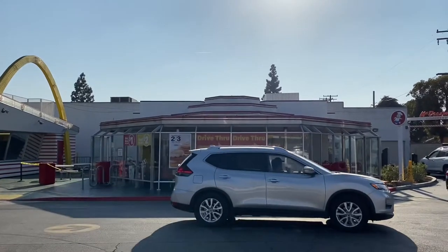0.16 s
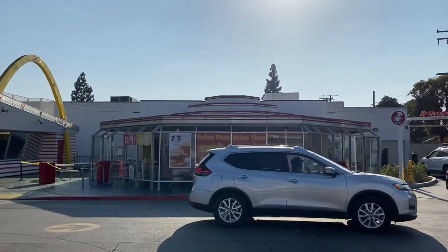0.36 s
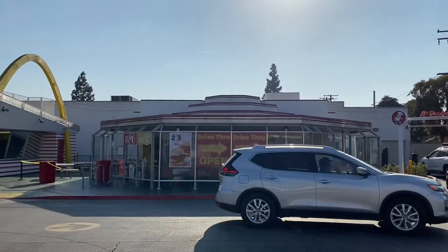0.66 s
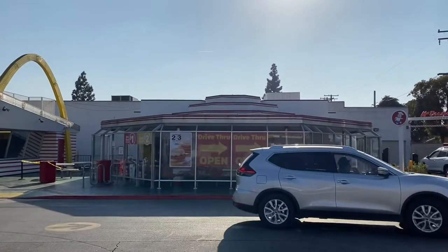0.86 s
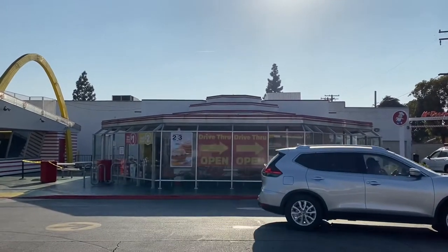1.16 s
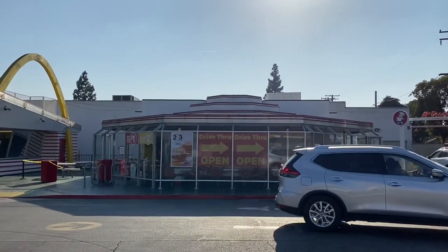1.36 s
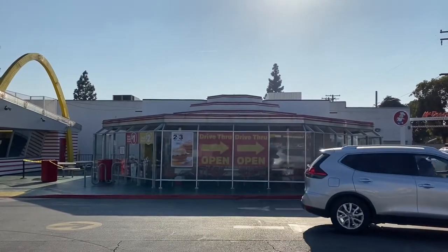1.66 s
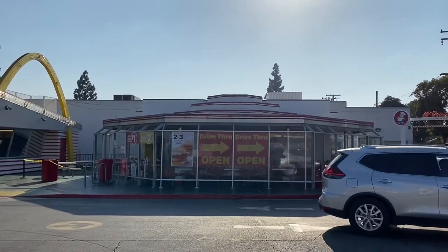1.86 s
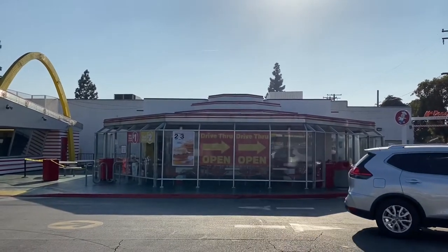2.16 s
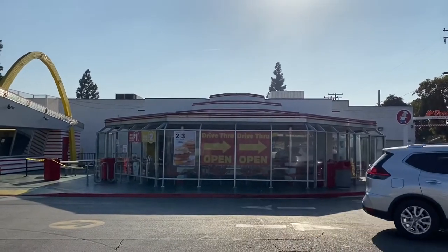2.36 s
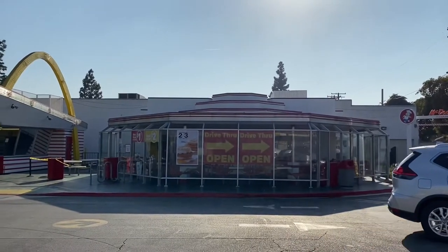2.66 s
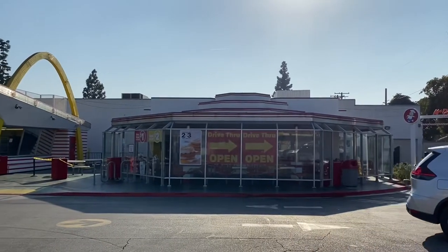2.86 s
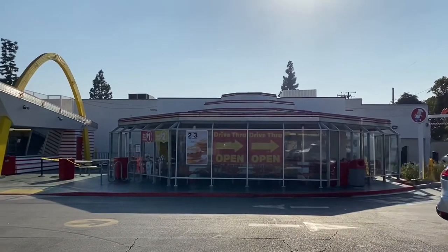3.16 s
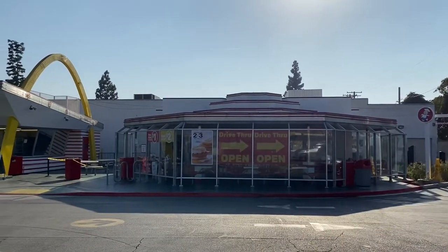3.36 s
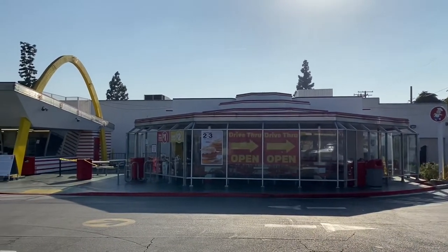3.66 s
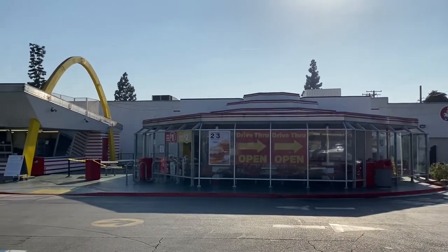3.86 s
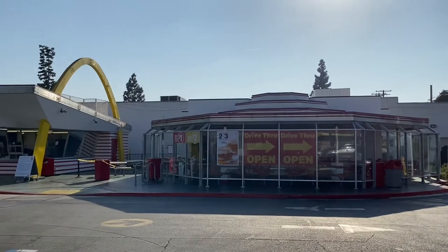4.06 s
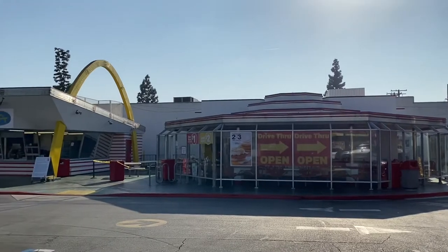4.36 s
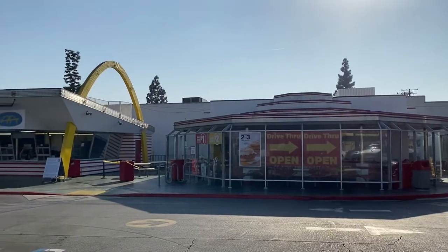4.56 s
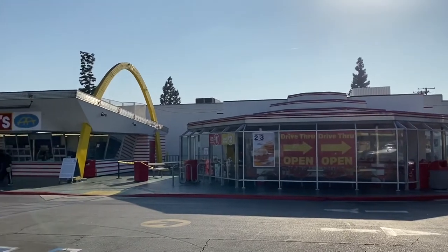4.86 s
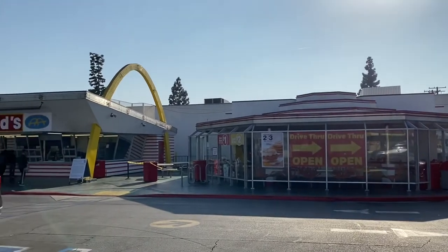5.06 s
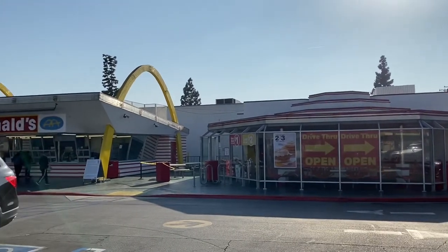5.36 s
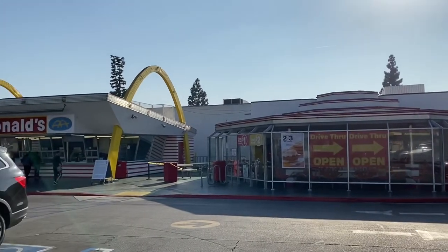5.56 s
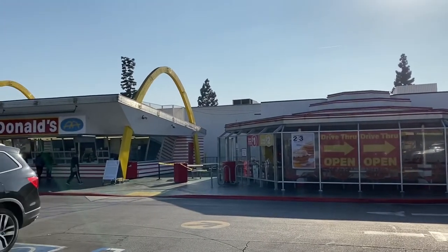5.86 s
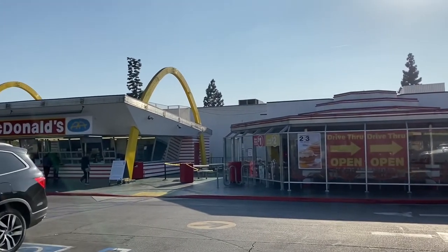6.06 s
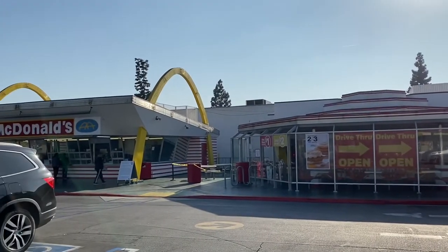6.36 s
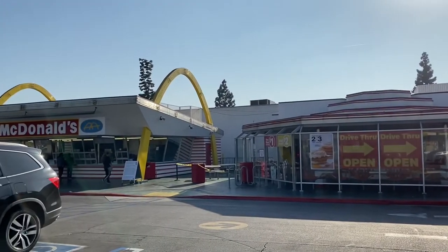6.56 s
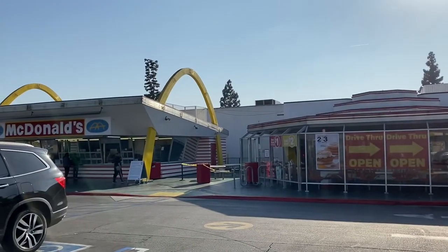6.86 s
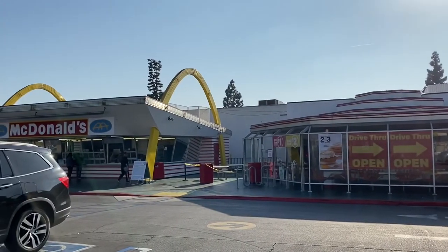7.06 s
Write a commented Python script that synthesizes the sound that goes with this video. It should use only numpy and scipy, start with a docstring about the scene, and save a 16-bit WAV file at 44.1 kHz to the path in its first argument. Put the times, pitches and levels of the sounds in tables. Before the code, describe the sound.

In an open drive-through lot, a lumpy low engine rumble and soft traffic surround the microphone. Slow tyres hiss close on the right; around one and a half seconds another engine revs briefly and a deep exhaust boom starts, rising and falling with the pedal. Later, a second car rolls by on the left with a swelling tyre roar and faint gliding drone. Thin bird-like chirps gather near the end. Handheld phone, wide stereo.

```python
"""A drive-through lot: a car creeps past to the right, its exhaust a stack of sines that boom with the pedal.
A second engine revs briefly, another idles (wavering sines), and a further car rolls by out of sight on the left.
Sines make short hums, a gliding drone with a whine, faint squeaks and a roof fan. Filtered noise makes tyres,
engine-bay hiss, grit, high chirps (probably a small bird), a steady hiss, the queue's rumble and town traffic.
A hand-held phone with two microphone openings (ports) and a widened stereo image hears it all."""
import sys
import numpy as np
from scipy import signal
from scipy.fft import rfft, irfft
from scipy.io import wavfile

SR = 44100
rng = np.random.default_rng(int(sys.argv[2]) if len(sys.argv) > 2 else 0)


def generate_wav(signal):
    """Clip the signal to [-1, 1] and save it as 16-bit WAV at the path in sys.argv[1]."""
    frames = np.transpose(np.atleast_2d(signal))
    scaled = np.clip(frames, -1, 1) * 32767
    pcm = np.round(scaled).astype(np.int16)
    wavfile.write(sys.argv[1], SR, pcm)


N = 317961  # samples, about 7.2 s
TIME = np.arange(N) / SR
FREQ = np.maximum(np.arange(N // 2 + 1) * SR / N, 1)


def undb(db):
    """Turn decibels into a gain."""
    return 10 ** (np.asarray(db) / 20)


def curves(table):
    """Each column of a table, joined by straight lines in time."""
    s, *columns = np.transpose(table)
    return [np.interp(TIME, s, column) for column in columns]


def colour(points):
    """Gain at every frequency, from points of f/Hz and level/dB."""
    hz, db = np.transpose(points)
    return undb(np.interp(np.log(FREQ), np.log(hz), db))


def white():
    """Spectrum of white noise at 0 dB per Hz."""
    return rfft(rng.standard_normal(N)) * np.sqrt(SR / 2)


def noise(points):
    """Coloured noise from one place."""
    return irfft(white() * colour(points), N)


def walk(rate, size=4096):
    """A slow random wander of spread 1, moving about rate times a second."""
    hz = np.arange(size // 2 + 1) * SR / N
    x = irfft(rfft(rng.standard_normal(size)) / (1 + (hz / rate) ** 4))
    return np.interp(TIME, np.linspace(0, N / SR, size), x / x.std())


def tone(hz):
    """A sine of rms 1 that follows a pitch curve."""
    return np.sqrt(2) * np.sin(2 * np.pi * (np.cumsum(hz) / SR + rng.random()))


def bell(centre_s, width_s):
    """A smooth rise to 1 and fall; width_s from the centre it is down to 37 %."""
    return np.exp(-np.minimum(((TIME - centre_s) / width_s) ** 2, 30))


def held(on_s, off_s, attack_s, release_s):
    """Climbs towards 1 while held, then dies away; both at exponential time constants."""
    climb = 1 - np.exp(-np.maximum(np.minimum(TIME, off_s) - on_s, 0) / attack_s)
    return climb * np.exp(-np.maximum(TIME - off_s, 0) / release_s)


def going_by(nearest_s, width_s):
    """Gain 1 / distance on a straight path: 1 at its nearest, 3 dB less width_s away."""
    return 1 / np.hypot(1, (TIME - nearest_s) / width_s)


def ports(x, lag_ms, pan_db=0):
    """Sound from the right reaches the left port late (positive lag); pan_db is left minus right."""
    half_lag_s = lag_ms / 2000
    left = np.interp(TIME - half_lag_s, TIME, x) * undb(pan_db / 2)
    right = np.interp(TIME + half_lag_s, TIME, x) * undb(-pan_db / 2)
    return np.array([left, right])


PORT_MS = 0.41  # travel time of sound between the ports


def diffuse(points):
    """Noise from all around: alike at both ports only while the waves are long."""
    alike = np.sinc(2 * FREQ * PORT_MS / 1000)
    mid, side = (irfft(white() * colour(points) * np.sqrt((1 + sign * alike) / 2), N) for sign in (1, -1))
    return np.array([mid + side, mid - side])


# how fast the creeping car's engine fires: [t/s, firing rate f/Hz]
ENGINE_SPEED = [(1.5, 44.8), (1.79, 62.5), (1.97, 66.5), (2.4, 60.9), (2.7, 60.5), (3.2, 63.5), (3.45, 66),
                (3.75, 65.3), (3.97, 57), (4.17, 52), (4.45, 52), (4.79, 48.6), (5.37, 58.5), (5.6, 58),
                (5.76, 55), (5.98, 58.3), (6.6, 57), (7.2, 56.8)]
# where the car is, as the left port's delay: [t/s, lag/ms]
BEARING_LAG = [(0, 0.35), (3.2, 0.3), (4.2, 0.31), (4.9, .08), (7.2, .03)]
# brief dips and surges of boom and throb: [middle t/s, half length/s, level/dB]
BOOM_SURGES = [(1.844, 0.018, 4.5), (2.396, 0.017, -4.5), (3.275, 0.02, -15), (3.5, 0.19, 1.5),
               (4.007, 0.075, 1.5), (4.183, 0.021, -5.5), (4.882, 0.068, 3), (5.191, .03, 7.5),
               (5.77, 0.07, -16), (6.916, .17, -10)]
# above this firing rate the silencer swallows the boom
SILENCER_HZ, SILENCER_DB_PER_HZ, SILENCER_MOST_DB = 64.36, 2.5, 6
FOURTH_DB = -7  # fourth multiple of the firing rate, against the third


def creeping_car():
    """Firings drive the exhaust at multiples of their rate (orders); it booms on the second."""
    hz = curves(ENGINE_SPEED)[0]
    boom, throb, third, rough = exhaust_gains()
    swallowed_db = np.clip(SILENCER_DB_PER_HZ * (hz - SILENCER_HZ), 0, SILENCER_MOST_DB)
    boom = boom * undb(-swallowed_db)
    hz = hz * (1 + .001 * walk(12))
    exhaust = tone(2 * hz) * boom + tone(hz) * throb * undb(0.74 * walk(21))
    exhaust *= undb(sum(db * bell(s, length) for s, length, db in BOOM_SURGES))
    overtones = tone(3 * hz) + tone(4 * hz) * undb(FOURTH_DB + 2.0 * walk(11))
    exhaust += overtones * third * undb(1.0 * walk(42))
    # no two firings are equally strong
    exhaust *= undb(.7 * walk(40))
    # the growl comes off the buildings
    return ports(exhaust, curves(BEARING_LAG)[0]) + ports(growl(hz) * rough, lag_ms=-0.06)


# presses of the pedal, with the level each part heads for before its unevenness, surges and silencer:
# [down t/s, up t/s, second-order boom level/dB, firing throb level/dB, third-order level/dB, growl level/dB]
PEDAL_PRESSES = [(1.5, 3.223, -17.5, -31, -34, -44.5), (4.192, 5.236, -17, -33, -36.5, -38),
                 (5.128, 5.589, -17, -27.5, -32, -35), (5.927, 6.483, -21, -24, -44, -41),
                 (6.564, 6.638, -13, -38, -42, -48), (7.072, 7.253, -18.5, -43, -57, -48)]
# time constants: throb and overtones build up more slowly than the boom; growl needs sustained load
BOOM_ATTACK_S, OVERTONE_ATTACK_S, GROWL_ATTACK_S, RELEASE_S = 0.15, 0.23, 0.6, 0.096
OVERTONE_LEAD_S = 0.14  # throb and overtones go first as the pedal lifts
FUEL_CUT_S = 0.22  # time constant of the coasting hum's return after a lull
# coasting with the pedal up: boom and growl fade as the car draws away, the deep throb carries on
COAST_BOOM_DB, COAST_THROB_DB, COAST_GROWL_DB, RECEDE_DB_PER_S = -17, -30, -37, 3
# unevenness of the boom: a slow swell throughout, and stumbling while it coasts
SWELL_DB, STUMBLE_DB = .5, 1.8


def exhaust_gains():
    """Gains of boom, throb, third order and growl: each press takes over from the coasting engine."""
    start_s = ENGINE_SPEED[0][0]
    running = held(start_s, N / SR, BOOM_ATTACK_S, RELEASE_S)
    coast = running * undb(-RECEDE_DB_PER_S * (TIME - start_s))
    boom = coast * undb(COAST_BOOM_DB + STUMBLE_DB * walk(36))
    throb = running * undb(COAST_THROB_DB)
    third = 0
    rough = coast * undb(COAST_GROWL_DB)
    for down, up, boom_db, throb_db, third_db, growl_db in PEDAL_PRESSES:
        coasting = 1 - held(down, up, BOOM_ATTACK_S, FUEL_CUT_S)
        overtones = held(down, up - OVERTONE_LEAD_S, OVERTONE_ATTACK_S, RELEASE_S)
        boom = np.hypot(boom * coasting, held(down, up, BOOM_ATTACK_S, RELEASE_S) * undb(boom_db))
        throb = np.hypot(throb * coasting, overtones * undb(throb_db))
        third = np.hypot(third, overtones * undb(third_db))
        rough = np.hypot(rough * coasting, held(down, up, GROWL_ATTACK_S, RELEASE_S) * undb(growl_db))
    return boom * undb(SWELL_DB * walk(4.0)), throb, third, rough


# resonances that the growl rings: [f/Hz, relative level/dB]
GROWL_RESONANCES = [(150, -5), (215, 2), (262, -2), (295, 3.5), (345, 0.5), (470, -19), (590, -4),
                    (710, -9.5), (800, -28.5)]
# colour of the puffs of exhaust gas: [f/Hz, relative level/dB]
GAS_PUFFS = [(200, -19.5), (400, -2), (650, 0), (1000, -2), (1600, -9.5), (3000, -28.5)]
RASP_DB, RASP_SHARE = -14.5, 0.34  # level against the growl; decay as a share of a boom cycle


def growl(hz):
    """Unequal cylinders fill in every half order, through resonances; gas rasps with each boom beat."""
    orders = np.arange(7, 29) / 2
    x = sum(tone(k * hz * (1 + 0.0026 * walk(9.5))) * undb(3.3 * walk(13.0)) for k in orders)
    x = irfft(rfft(x) * colour(GROWL_RESONANCES), N)
    boom_phase = np.cumsum(2 * hz) / SR % 1
    rasp = noise(GAS_PUFFS) * np.exp(-boom_phase / RASP_SHARE)
    return x / x.std() + rasp / rasp.std() * undb(RASP_DB)


# a brief high sizzle as the car goes by: [f/Hz, level/dB per Hz at its peak]
SIZZLE_COLOUR = [(5000, -125), (7200, -95), (9000, -101), (10200, -101), (14000, -112)]
SIZZLE_S, SIZZLE_WIDTH_S = 2.06, 0.078
# what the engine bays ring with:
# [f/Hz, half width/Hz, peak level/dB per Hz, loudest t/s, time to fall by 3 dB/s, flutter/dB]
BAY_RESONANCES = [(2670, 140, -81.5, 1.6, 1.15, 2), (3240, 210, -88.5, 2.2, 1.2, 2),
                  (3790, 210, -78, 2.34, 0.64, 2.5), (3865, 120, -83, 5.3, 3, 3)]


def engine_bay():
    """Noise in narrow resonances flutters and swells as the cars go by, with one brief sizzle."""
    out = noise(SIZZLE_COLOUR) * bell(SIZZLE_S, SIZZLE_WIDTH_S)
    for hz, width, db, s, width_s, flutter_db in BAY_RESONANCES:
        ring = irfft(white() / (1 + ((FREQ - hz) / width) ** 2), N)
        out = out + ring * going_by(s, width_s) * undb(db + flutter_db * walk(30))
    return ports(out, lag_ms=0.35, pan_db=5.5)


# hiss of slow tyres before each roll's own level: [f/Hz, level/dB per Hz]
TYRE_HISS = [(100, -83.5), (400, -87.5), (680, -75), (1000, -82.5), (1300, -75), (1800, -76.5), (2300, -86),
             (2700, -91.5), (3200, -94), (5000, -88.5), (6200, -100), (8000, -104), (10000, -107),
             (12000, -115), (14200, -106)]
# tyres creeping through the lot: [nearest t/s, time to fall by 3 dB/s, level/dB against the hiss colour,
# lag of the left port/ms, left minus right/dB, top treble level/dB]
TYRE_ROLLS = [(1.55, 1.14, 2.5, 0.333, 2, 1), (7.0, 1.5, -8.5, -.41, 5.5, -12)]


def tyres():
    """Slow tyres hiss on the asphalt, louder the nearer they are."""
    out = 0
    for s, width, db, lag_ms, pan_db, treble_db in TYRE_ROLLS:
        treble = colour([(8000, 0.0025), (13000, treble_db)])
        hiss = irfft(white() * colour(TYRE_HISS) * treble, N)
        out = out + ports(hiss * going_by(s, width) * undb(db + 2.0 * walk(21)), lag_ms, pan_db)
    return out


# grit snapping under a tyre: [t/s, level/dB]
GRIT_SNAPS = [(.441, -43), (3.555, -54), (4.385, -57)]


def grit():
    """A small stone cracks under the tread: a very short, bright click."""
    crack = noise([(2000, -30), (7000, 0), (15000, -3)])
    envelope = sum(undb(db) * (TIME >= s) * np.exp(-np.abs(TIME - s) / .0012) for s, db in GRIT_SNAPS)
    return ports(crack / crack.std() * envelope, lag_ms=0.31)


# the second engine's short rev: a bell of pitch, loudest while it speeds up
REV_S, REV_WIDTH_S, REV_IDLE_HZ, REV_TOP_HZ = 1.53, .21, 104.1, 144.3
REV_DOWN_S, REV_EASE_S, REV_UP_S = 1.26, 1.374, 1.58
REV_DB, REV_PULL_DB, REV_ROUGH_DB = -30.5, -23, 2.2
REV_DRONE_HZ, REV_DRONE_DB, REV_DRONE_S = 300, -44, 0.35  # pitch at the rev's top, level, half length


def revving_car():
    """A short dab of throttle: the boom bites at once, then sputters on under a weak higher drone."""
    hz = REV_IDLE_HZ + (REV_TOP_HZ - REV_IDLE_HZ) * bell(REV_S, REV_WIDTH_S)
    pull = held(REV_DOWN_S, REV_EASE_S, attack_s=0.022, release_s=0.035)
    run_on = held(REV_DOWN_S, REV_UP_S, attack_s=.06, release_s=0.091)
    boom = tone(hz) * (undb(REV_DB) * run_on + undb(REV_PULL_DB) * pull)
    drone = tone(REV_DRONE_HZ * (hz / REV_TOP_HZ) ** .3)
    drone = drone * bell(REV_S, REV_DRONE_S) * undb(REV_DRONE_DB + 2 * walk(20))
    return ports((boom + drone) * undb(REV_ROUGH_DB * walk(30)), lag_ms=0.27)


# hidden car's tyre roar before it is shared out and swells: [f/Hz, level/dB per Hz]
HIDDEN_TYRES = [(80, -72.5), (200, -59), (320, -62.5), (450, -69.5), (680, -75), (1000, -70), (1700, -78.5),
                (2400, -86.5), (3200, -100), (6000, -101), (12000, -120)]
# nearest moment, time to fall by 3 dB, gain there, and gain of the steady roar of the road behind
FAR_S, FAR_WIDTH_S, FAR_DB, ROAD_DB = 5.456, 0.61, -0.5, -8.5


def passing_car():
    """Tyre roar (noise) swells and fades on the left, partly scattered by the buildings."""
    roar = diffuse(HIDDEN_TYRES) * undb(-2.0) + ports(noise(HIDDEN_TYRES), lag_ms=-0.45) * undb(-3.0)
    near = going_by(FAR_S, FAR_WIDTH_S)
    return roar * np.hypot(near * undb(FAR_DB), undb(ROAD_DB)) * undb(walk(13.0))


# the drone's pitch climbs from low towards high between two moments, then sinks back
DRONE_LOW_HZ, DRONE_HIGH_HZ, DRONE_CLIMB_S, DRONE_TURN_S = 191.6, 358, 3.6, 5.5
DRONE_RISE_S, DRONE_SINK_S = .66, .58  # time constants
DRONE_DB, DRONE_HEARD_S, DRONE_FADE_S = -45.5, 4.06, 5.95
# the whine: middle pitch, share it moves to either side of it as it sinks, when, how fast, level
WHINE_HZ, WHINE_SINK, WHINE_SINK_S, WHINE_SINK_WIDTH_S, WHINE_DB = 667, 0.068, 5.6, 0.1965, -49.5


def gliding_drone():
    """A gliding drone with a lower rough partial, and a higher two-part whine that sinks."""
    glide = held(DRONE_CLIMB_S, DRONE_TURN_S, DRONE_RISE_S, DRONE_SINK_S)
    hz = DRONE_LOW_HZ + (DRONE_HIGH_HZ - DRONE_LOW_HZ) * glide
    hz = hz * (1 + 0.006 * walk(17))
    # the rough partial is strongest as the passing tyres come nearest
    partial = tone(0.79 * hz) * walk(4.0) * undb(1.5) * going_by(FAR_S, FAR_WIDTH_S)
    heard = held(DRONE_HEARD_S, DRONE_FADE_S, attack_s=0.1, release_s=0.18)
    drone = (tone(hz) + partial) * undb(DRONE_DB + 0.87 * walk(10.0)) * heard
    sink = 1 - WHINE_SINK * np.tanh((TIME - WHINE_SINK_S) / WHINE_SINK_WIDTH_S)
    whine_hz = WHINE_HZ * sink * (1 + .016 * walk(20.4))
    whine = tone(whine_hz) * undb(4.2 * walk(10)) + tone(.87 * whine_hz) * undb(-2.5 + 3.8 * walk(14))
    whine = whine * undb(WHINE_DB) * bell(FAR_S, FAR_WIDTH_S)
    return ports(drone + whine, lag_ms=-0.1)


# an idling engine's low lines, at 3 to 13 times its turning rate: [level/dB]
IDLE_LINES = [-44, -36.5, -38.5, -44, -41, -45.5, -45.5, -52.5, -51.5, -55.5, -50]
IDLE_HZ, IDLE_WAVER, IDLE_FLUTTER_DB = 14.6, 0.01807, 2.5  # turns per second, waver (share), flutter


def idling_car():
    """A lumpy idle: unequal firings repeat every turn, so all its low lines waver together."""
    hz = IDLE_HZ * (1 + IDLE_WAVER * walk(6.07))
    lines = enumerate(IDLE_LINES, 3)
    idle = sum(tone(k * hz) * undb(db + IDLE_FLUTTER_DB * walk(2.0)) for k, db in lines)
    return ports(idle, lag_ms=0.29)


# short hums, low and middle, that swell and fade: [loudest t/s, half length/s, f/Hz, level/dB]
BRIEF_HUMS = [(0.015, 0.07, 99.7, -33), (0.613, 0.078, 67.16, -29), (0.804, 0.14, 243, -44),
              (0.885, 0.024, 74, -25), (1.076, 0.14, 103.5, -35), (1.342, 0.1, 167, -40),
              (1.703, 0.058, 232.4, -38.5), (2.296, 0.045, 250, -36), (2.99, 0.047, 253, -37),
              (3.13, 0.065, 62, -25.5), (3.434, 0.049, 169, -31.5), (4.574, 0.13, 319.5, -42.5),
              (5.172, 0.086, 53.2, -25), (5.553, 0.08, 263, -37.5), (5.6, .06, 45.5, -28.5),
              (5.994, 0.054, 258, -36)]
HUM_WAVER = 0.0149  # share of the pitch


def brief_hums():
    """Short wavering sines that swell and fade, low and middle in pitch."""
    out = 0
    for s, length, hz, db in BRIEF_HUMS:
        out = out + tone(hz * (1 + HUM_WAVER * walk(10.3))) * bell(s, length) * undb(db)
    return ports(out, lag_ms=0.29)


# the clearest chirps: [t/s, level/dB before the attack, f/Hz, time to fall by 60 dB/s]
CLEAR_CHIRPS = [(.204, -52.5, 6100, 0.18), (4.02, -47.5, 6340, 0.094), (4.35, -55, 6430, 0.12),
                (4.514, -54, 6120, .16), (5.505, -58, 6300, .16), (6.004, -50, 6400, 0.13),
                (6.2, -57, 6000, 0.27), (6.505, -46.5, 6330, .19), (6.7, -55.5, 6100, 0.3)]
CHIRP_ATTACK_S, CHIRP_ROUGH_DB = .004, 2.5
# fainter chirps that run together around the late ones
PATTER_S, PATTER_WIDTH_S, PATTER_HZ, PATTER_DB = 6.15, 0.71, 6240, -65.5


def chirps():
    """Brief rough high chirps of ringing noise, probably a small bird; fainter ones run together."""
    out = chirp_noise(PATTER_HZ) * bell(PATTER_S, PATTER_WIDTH_S) * undb(PATTER_DB + 2.7 * walk(15))
    for s, db, hz, t60 in CLEAR_CHIRPS:
        age = np.maximum(TIME - s, 0)
        attack = 1 - np.exp(-age / CHIRP_ATTACK_S)
        decay = np.exp(-np.log(1000) * np.minimum(age / t60, 10))
        out += chirp_noise(hz) * undb(db) * attack * decay
    return ports(out * undb(CHIRP_ROUGH_DB * walk(180)), lag_ms=-0.024, pan_db=3.5)


# the bands that make up a chirp: [multiple of its pitch, width at half height/Hz, relative level/dB]
CHIRP_BANDS = [(0.961, 130.5, 6), (1.01, 150, 7), (1.14, 380, 1.5), (1.33, 920, -10.5), (1.48, 600, -11.5),
               (1.6, 714, -17)]


def chirp_noise(hz):
    """Noise of rms 1 in a chirp's high bands."""
    bands = 0
    for ratio, width, db in CHIRP_BANDS:
        bands = bands + undb(db) / (1 + ((FREQ - ratio * hz) / width * 2) ** 2)
    x = irfft(white() * bands, N)
    return x / x.std()


# thin high squeaks: [middle t/s, half length/s, level/dB, f/Hz at the middle, glide/Hz per s]
HIGH_SQUEAKS = [(.225, 0.017, -66, 8150, -9000), (4.527, .014, -65, 8250, -6000),
                (5.05, .025, -69, 10000, -3000), (5.982, 0.046, -62, 6420, -1),
                (6.105, 0.011, -64, 8314, -25000), (6.297, 0.018, -63, 9200, -1500),
                (6.407, .018, -56, 6480, -2000), (6.43, 0.028, -56, 5750, 1502.5),
                (6.71, .025, -61, 5220, -1.5)]
SQUEAK_WAVER, SQUEAK_RATE = .018, 220  # share of the pitch, wavers per second


def squeaks():
    """Short rough whistles, each with its own pitch and glide."""
    out = 0
    for s, length, db, hz, glide in HIGH_SQUEAKS:
        pitch = hz + glide * np.clip(TIME - s, -2 * length, 2 * length)
        pitch = pitch * (1 + SQUEAK_WAVER * walk(SQUEAK_RATE))
        out = out + tone(pitch) * bell(s, length) * undb(db)
    return ports(out, lag_ms=-0.021, pan_db=2)


FAN_HZ, FAN_DB, FAN_WAVER = 480.3, -54.5, .005  # waver is a share of the pitch


def roof_fan():
    """A fan hums on one slightly wavering pitch."""
    fan = tone(FAN_HZ * (1 + FAN_WAVER * walk(9.0))) * undb(FAN_DB + 3.0 * walk(3.6))
    return ports(fan, lag_ms=0.23)


# colour of the waiting cars' rumble before its level curve: [f/Hz, level/dB per Hz]
QUEUE_RUMBLE = [(18, -89), (26, -77), (34, -54.5), (44, -60), (58, -51), (72, -46), (86, -51), (102, -47.5),
                (135, -56), (200, -80), (2000, -150)]
# how that rumble rises and falls: [t/s, level/dB]
QUEUE_LEVEL = [(0, -3), (.9, -3.5), (1.3, 3), (2.1, -0.5), (3.2, 2.9), (4.2, -5), (5.2, 1), (5.8, 1.5),
               (6.3, 1), (6.8, -3), (7.2, -4)]


def queue():
    """The waiting queue makes a lumpy low rumble: noise from all around."""
    return diffuse(QUEUE_RUMBLE) * undb(curves(QUEUE_LEVEL)[0] + 2.87 * walk(36))


# background hiss before its gain, strongest near 2.7 and 3.9 kHz: [f/Hz, level/dB per Hz]
STEADY_HISS = [(2300, -115), (2700, -86), (3100, -105), (3500, -93), (3700, -91.5), (3920, -90),
               (4150, -94.5), (6000, -112)]
STEADY_HISS_DB = -0.5


def steady_hiss():
    """A steady background hiss: noise from all around in narrow bands."""
    return diffuse(STEADY_HISS) * undb(STEADY_HISS_DB)


# town traffic: [f/Hz, level/dB per Hz]
TOWN_TRAFFIC = [(20, -86), (120, -58.5), (200, -63), (300, -71.5), (420, -69), (700, -77.5), (1200, -83),
                (1750, -78.5), (3000, -89.5), (4200, -90), (6300, -93.5), (8000, -103), (10500, -108),
                (14000, -124)]


def town():
    """Distant traffic blends into noise from all around, with a slight flutter."""
    return diffuse(TOWN_TRAFFIC) * undb(.5 * walk(21))


def scene():
    """The cars, rolling tyres, hums, the small high sounds and the background."""
    cars = creeping_car() + engine_bay() + tyres() + revving_car() + passing_car() + idling_car()
    hums = gliding_drone() + brief_hums()
    small_sounds = grit() + chirps() + squeaks()
    background = roof_fan() + queue() + steady_hiss() + town()
    return cars + hums + small_sounds + background


# overall tone of the sound, deepest bass cut and treble uneven: [f/Hz, level/dB]
OVERALL_TONE = [(20, -21.5), (31, 0), (7000, 0), (8500, -2.5), (9400, -0.5), (10700, 3), (11700, -12.5),
                (12600, 0), (13600, 0)]
# the phone's change to the side signal (left minus right): [f/Hz, level/dB]
SIDE_LIFT = [(50, 5), (200, 9), (700, 8.5), (1300, -1.5), (2100, -1.5), (15000, -0.5)]
TOP_HZ = 15000


def record(dry):
    """Cuts the deepest bass, makes the treble uneven, widens the lower midrange and cuts the top."""
    left, right = rfft(dry) * colour(OVERALL_TONE)
    mid = (left + right) / 2
    side = (left - right) / 2 * colour(SIDE_LIFT)
    wide = irfft(np.array([mid + side, mid - side]), N)
    return signal.sosfilt(signal.ellip(8, .2, 80, TOP_HZ, fs=SR, output="sos"), wide)


dry = scene()
out = record(dry)
generate_wav(out)
```